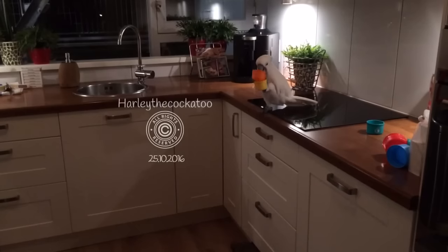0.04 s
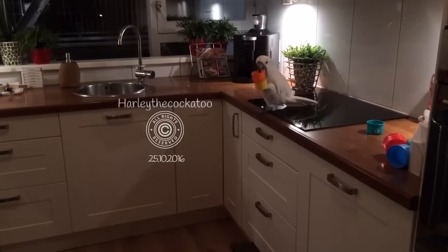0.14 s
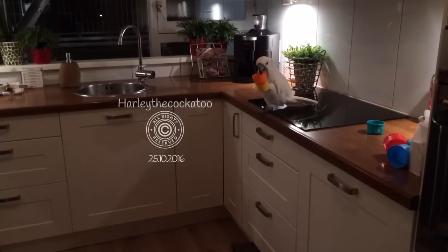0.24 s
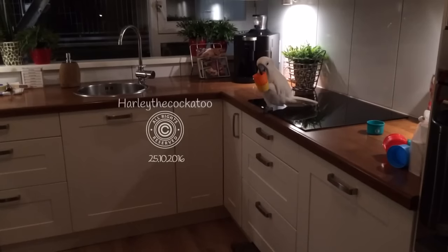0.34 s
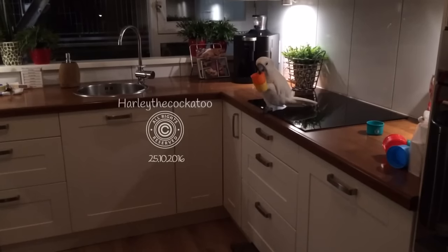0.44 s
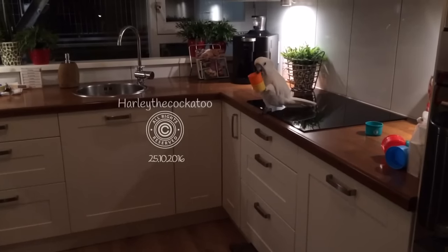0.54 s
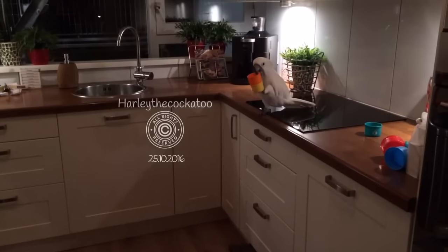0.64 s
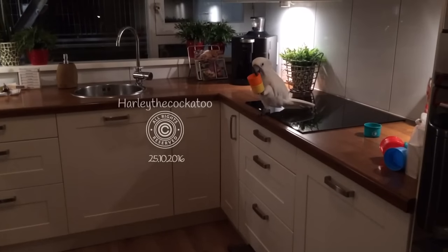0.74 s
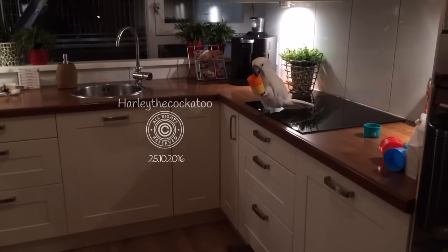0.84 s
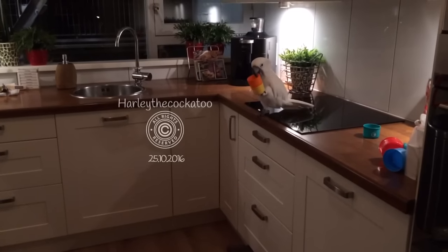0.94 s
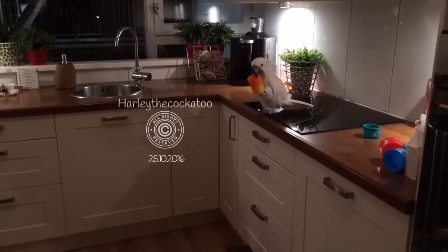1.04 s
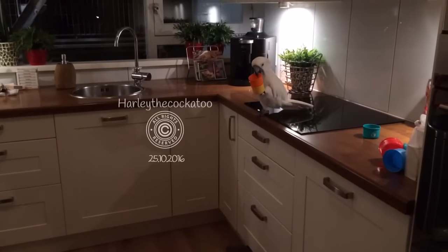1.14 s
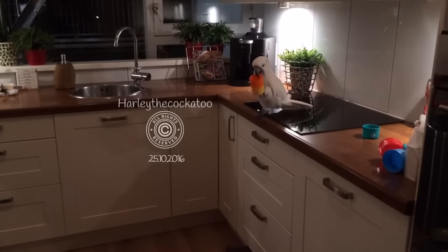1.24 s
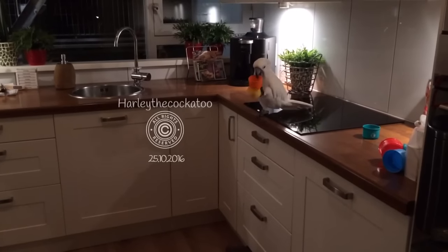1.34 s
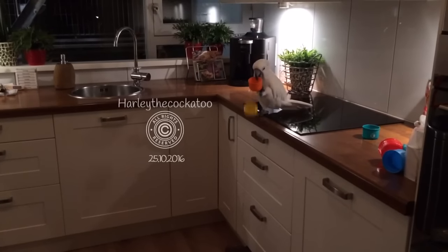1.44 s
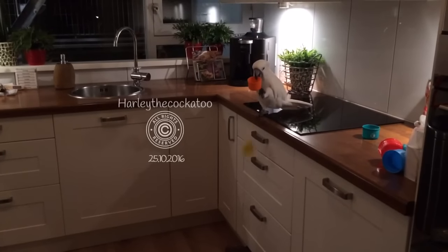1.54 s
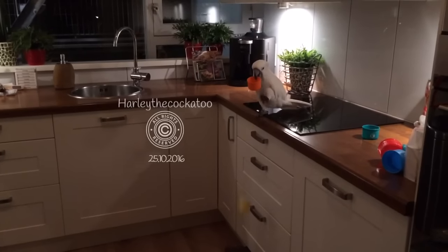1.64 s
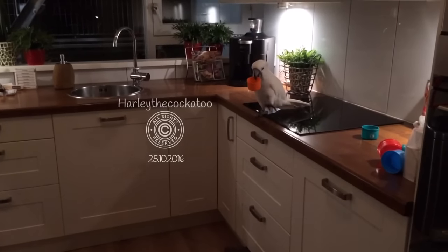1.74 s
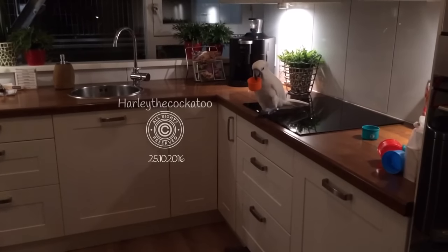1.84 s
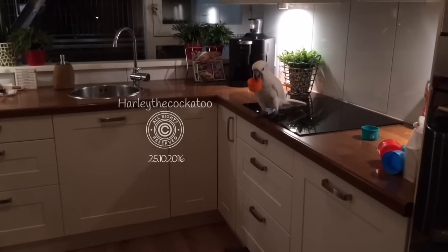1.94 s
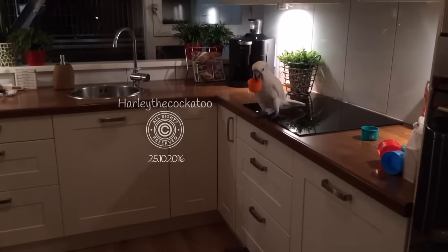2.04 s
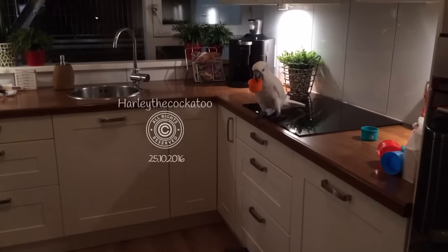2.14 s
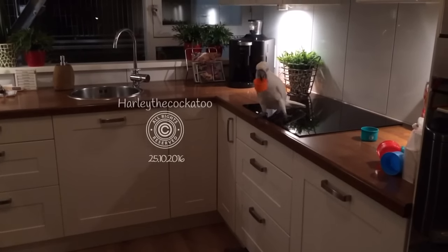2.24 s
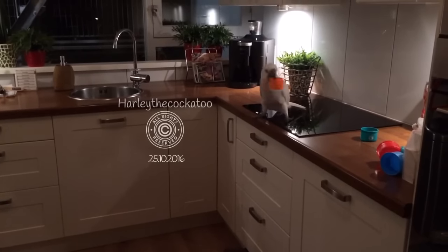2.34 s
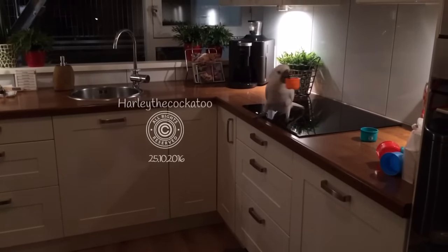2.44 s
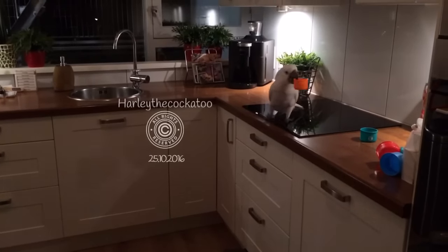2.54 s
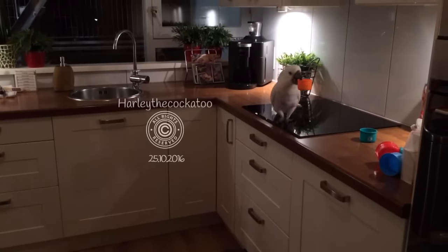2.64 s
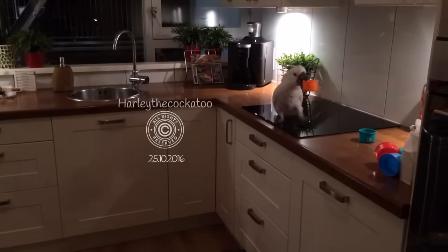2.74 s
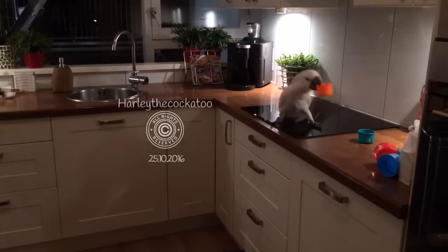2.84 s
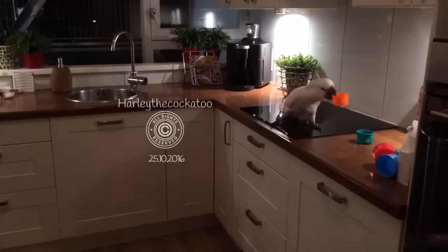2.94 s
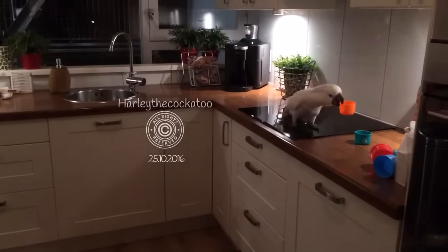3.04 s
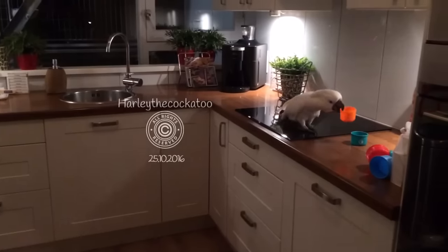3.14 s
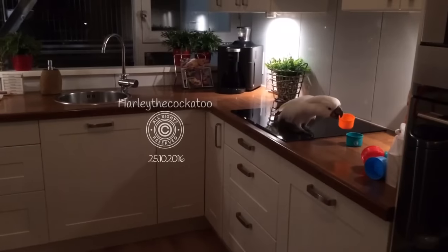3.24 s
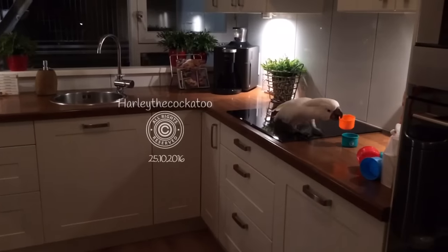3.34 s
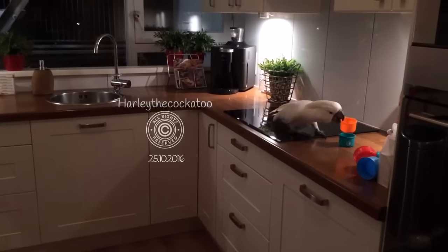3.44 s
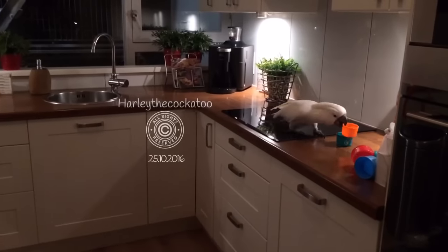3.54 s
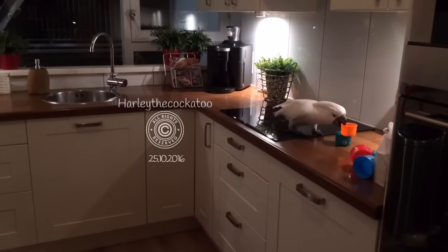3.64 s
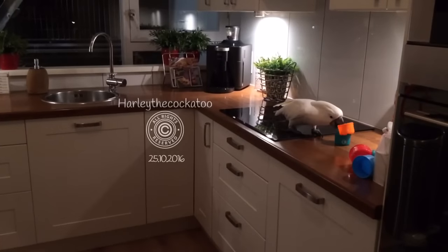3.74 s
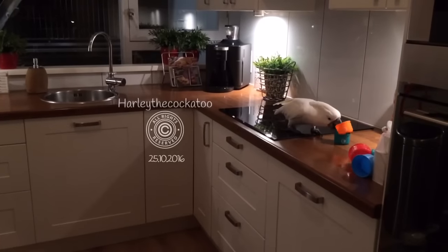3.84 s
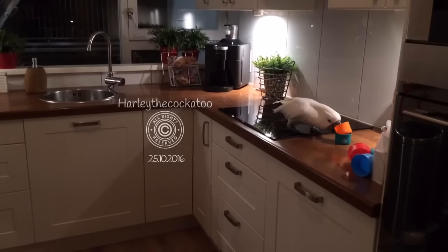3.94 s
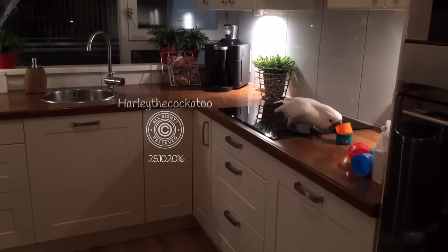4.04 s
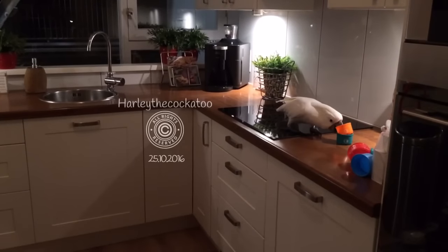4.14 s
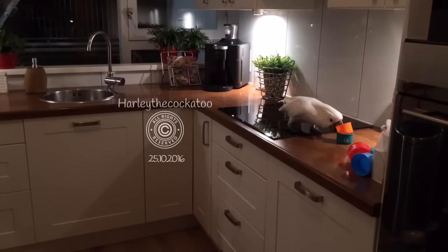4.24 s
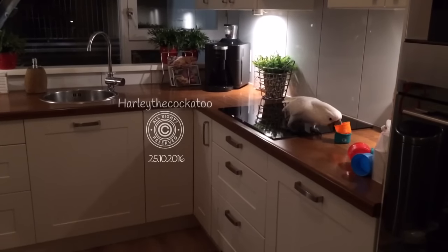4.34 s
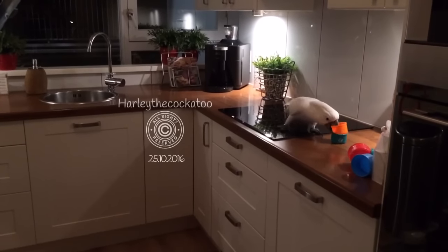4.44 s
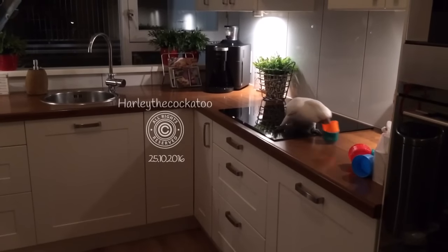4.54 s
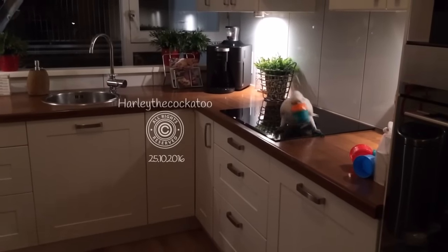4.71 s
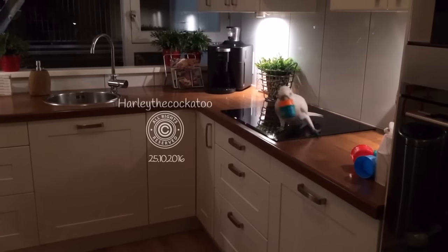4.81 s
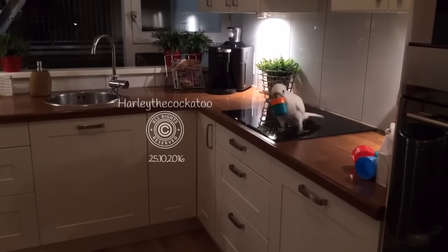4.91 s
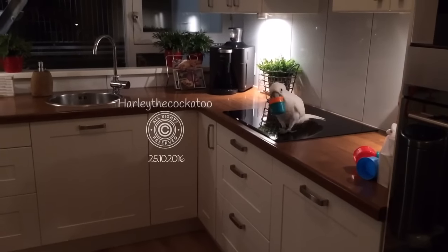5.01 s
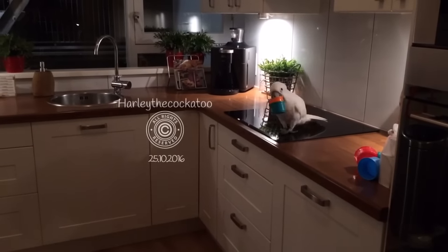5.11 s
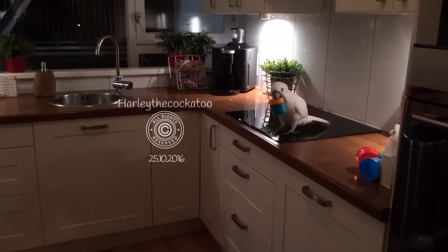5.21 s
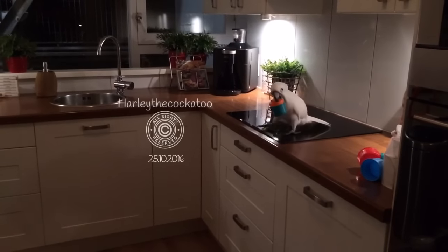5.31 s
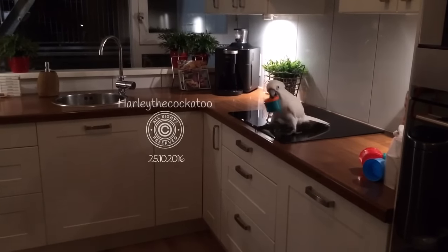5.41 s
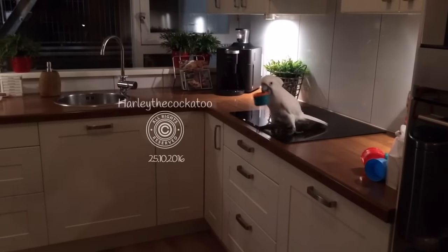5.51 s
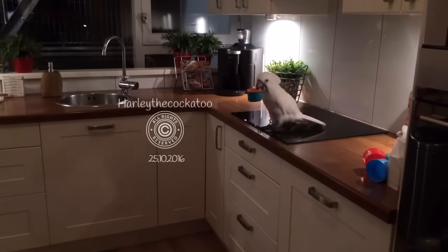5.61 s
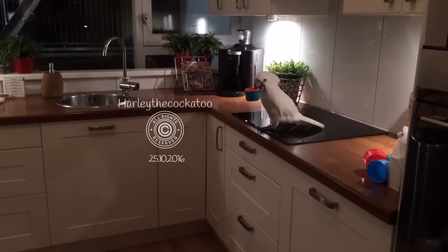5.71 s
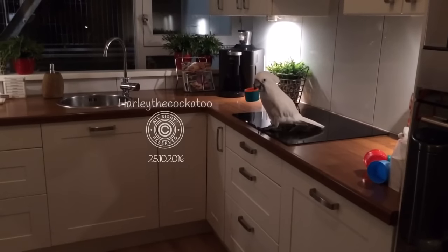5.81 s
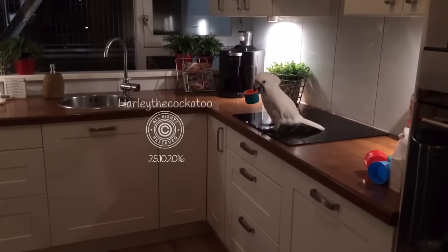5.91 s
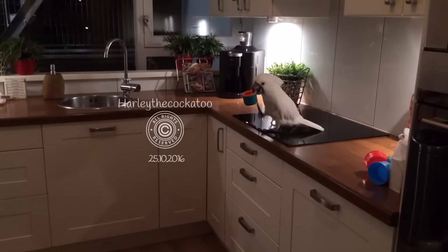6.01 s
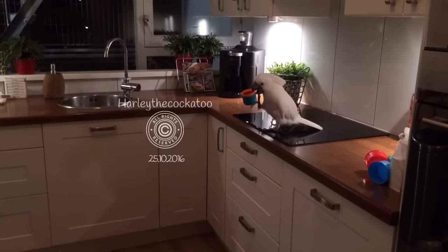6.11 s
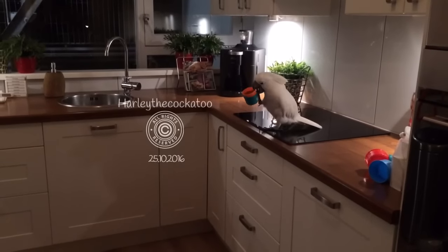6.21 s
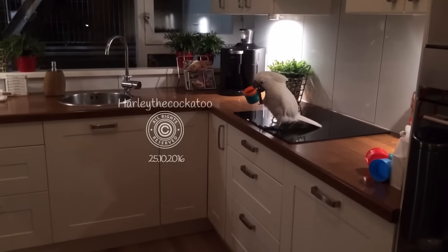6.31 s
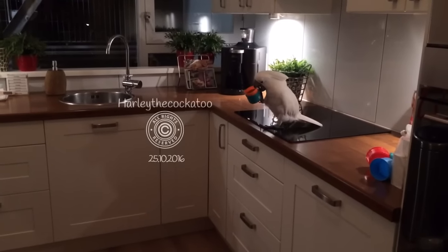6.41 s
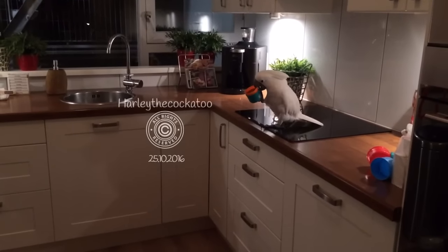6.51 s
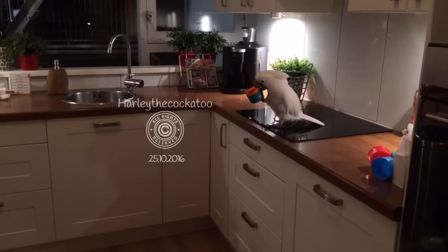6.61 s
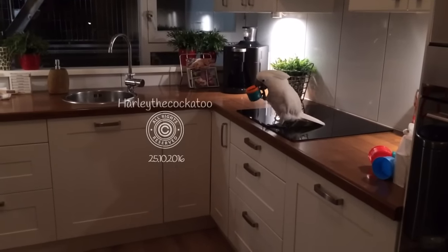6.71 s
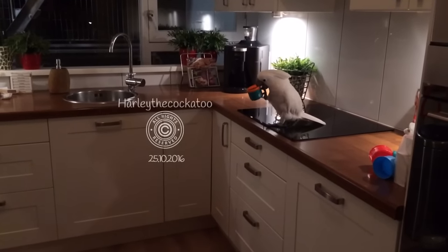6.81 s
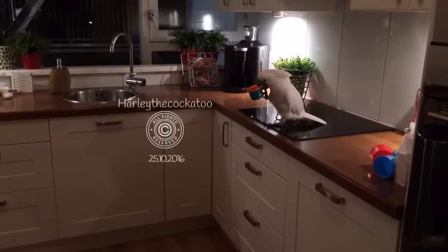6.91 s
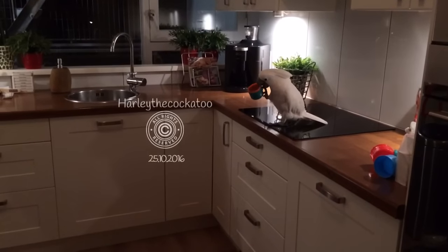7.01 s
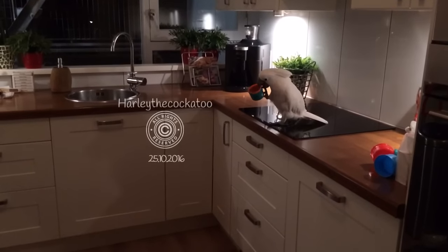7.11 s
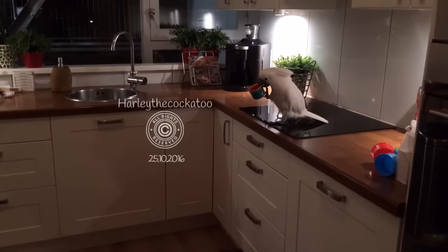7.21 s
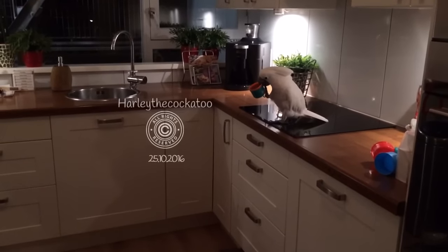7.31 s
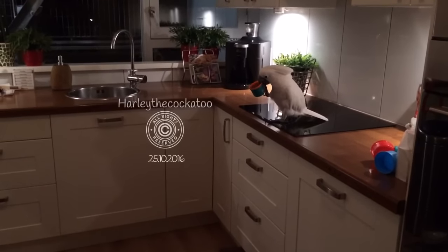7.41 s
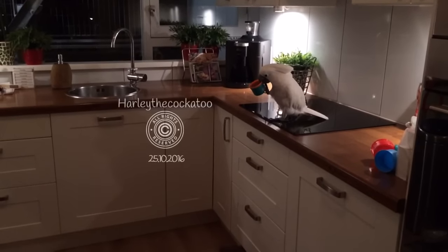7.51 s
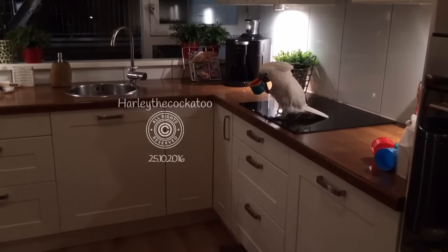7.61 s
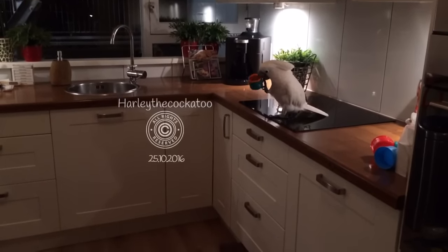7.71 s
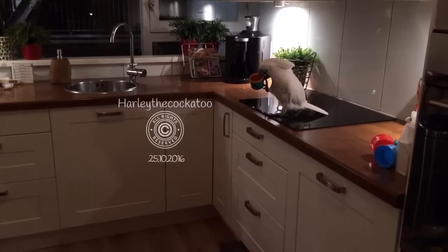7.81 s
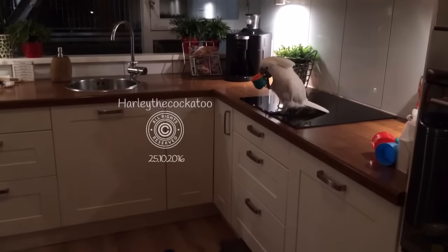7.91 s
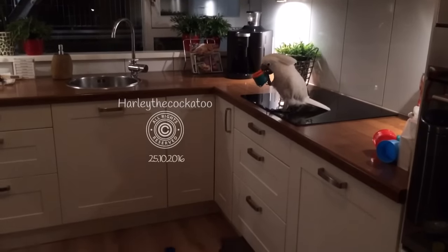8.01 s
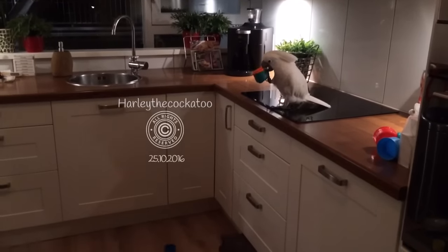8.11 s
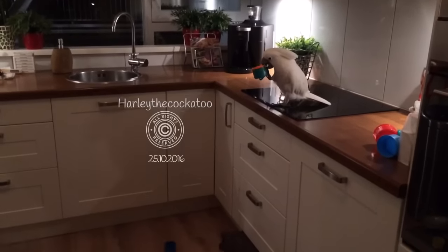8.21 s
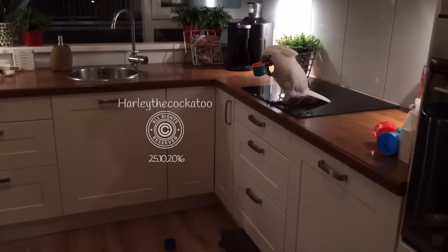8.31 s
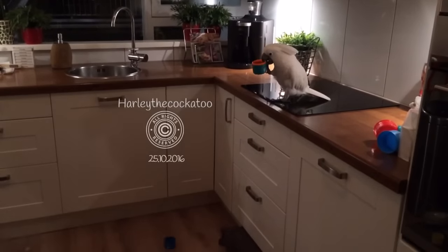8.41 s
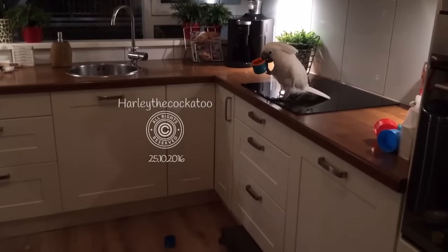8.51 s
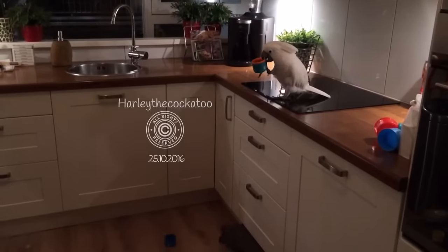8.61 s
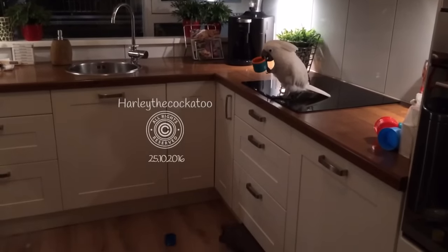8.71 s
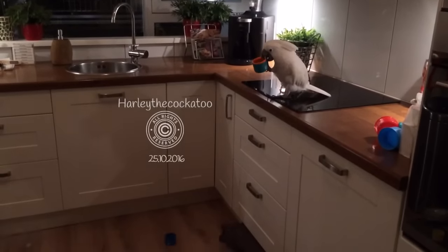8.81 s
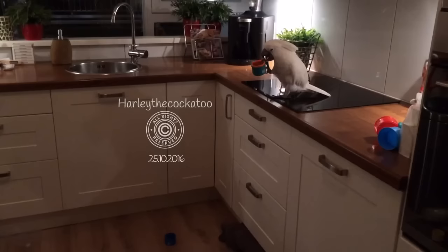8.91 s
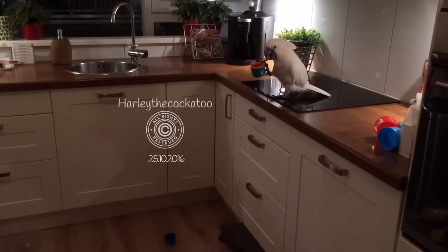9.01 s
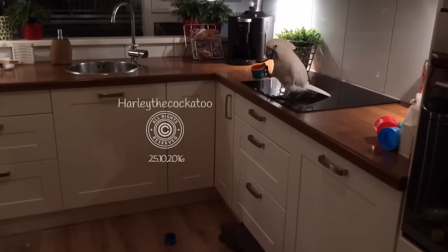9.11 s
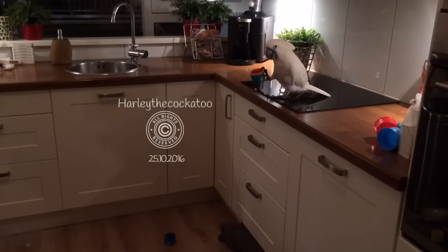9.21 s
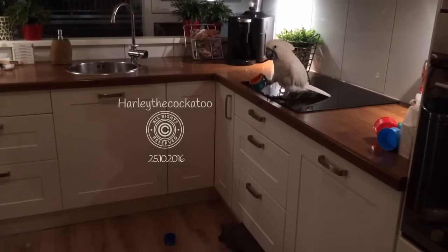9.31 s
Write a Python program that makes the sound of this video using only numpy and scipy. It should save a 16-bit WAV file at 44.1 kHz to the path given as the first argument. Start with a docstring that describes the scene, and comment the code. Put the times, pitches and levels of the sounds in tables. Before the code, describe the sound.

Thin plastic cups knock together with short, hollow, mid-pitched notes and crisp cracks, with tiny claw and beak clicks and dry rubbing between them. Early on a cup falls and slaps hard on floorboards. Afterwards come soft feather rustles, dull bumps on the worktop, one strong clack, a quieter stretch, and irregular light rattling. Heard from across a hard-surfaced kitchen with short reverberation and a faint low hum-like murmur.

```python
"""Small plastic stacking cups knock and chatter as a cockatoo plays with them on a glass hob in a quiet kitchen.
Each knock rings a hollow note and wall modes (damped sines) under a filtered crack; one cup falls on a wooden floor.
Beak and claws click in bursts of short pulses, dull thuds ring low modes, and random slips make rubs and rustles.
Contacts pass through a synthetic room of echoes and decaying noise; a low murmur and faint hiss lie beneath."""
import sys
import numpy as np
from scipy import signal
from scipy.fft import rfft, irfft
from scipy.io import wavfile

SR = 44100
rng = np.random.default_rng(int(sys.argv[2]) if len(sys.argv) > 2 else 0)


def wav_out(sig):
    """Save sig, one row per channel (or a flat mono array), as 16-bit PCM at SR to the path in sys.argv[1]."""
    wavfile.write(sys.argv[1], SR, np.round(np.clip(np.atleast_2d(sig).T, -1, 1) * 32767).astype(np.int16))


N = 412335
LENGTH = 32768  # samples in one hit or response
T = np.arange(LENGTH) / SR
HZ = np.fft.rfftfreq(LENGTH, 1 / SR)
TAP = signal.unit_impulse(LENGTH)  # a single clean contact

# wall modes of the early and later cups: (frequency [Hz], nominal width [Hz], level [dB])
FIRST_PAIR_MODES = [(1010, 810, -14), (1305, 390, -3), (1613, 260, -4), (1880, 220, -6), (2150, 330, -8.5),
                    (3400, 400, -19.5), (4123, 100, -15), (6330, 710, -14.5), (6750, 410, -18.5)]
SECOND_PAIR_MODES = [(910, 70, -8), (1160, 570, -0.5), (1540, 720, 2), (1920, 110, -6.5),
                     (2130, 320, -10.5), (2780, 520, -13.5)]
# falling cup's floor contacts:
# (time [s], relative force [dB], dullness [dB/octave], extra direct sound [dB])
FALL_CONTACTS = [(1.8934, 4.5, 2, 4), (1.897, 5.5, 3, -1.5), (1.905, -12, 0, 6), (1.9215, 0, 4.5, 4.5),
                 (1.937, -4.5, 17, 2.5)]

# a contact of this length has the plain spectrum; longer knocks are duller, longer clicks more diffuse
CONTACT_S, DULL_DB_PER_DOUBLING, DIFFUSE_DB_PER_DOUBLING = 0.0051, 4, 2.1


def gain_of(db):
    """Decibels to amplitude."""
    return 10 ** (np.asarray(db) / 20)


def evened(x):
    """Scales to rms 1."""
    return x / np.sqrt(np.mean(x ** 2) + 1e-20)


def at_level(x, db):
    """Sets the rms of a hit's first 50 ms."""
    return gain_of(db) * x / np.sqrt(np.mean(x[:SR // 20] ** 2) + 1e-20)


def read(points, hz):
    """Interpolates linearly on a log-frequency axis."""
    f, value = np.transpose(points)
    return np.interp(np.log(hz + 1), np.log(f + 1), value)


def add(mix, start_s, sound):
    """Mixes a sound in at start_s."""
    part = mix[round(start_s * SR):][:len(sound)]
    part += sound[:len(part)]


def through(x, response):
    """Convolves and keeps the length."""
    return signal.fftconvolve(x, response)[:len(x)]


def shaped(x, spectrum):
    """Filters a whole sound by this spectrum, at rms 1."""
    gain = gain_of(read(spectrum, np.fft.rfftfreq(N, 1 / SR)))
    return evened(irfft(rfft(x) * gain, N))


def snap(spectrum, tilt_db=0):
    """Minimum-phase pulse with this spectrum, tilted in dB/octave above 550 Hz."""
    octaves = np.log2(np.maximum(HZ / 550, 1))
    log_gain = np.log(gain_of(read(spectrum, HZ) + tilt_db * octaves))
    # folding the cepstrum makes the pulse causal
    cepstrum = irfft(log_gain)[:LENGTH // 2]
    cepstrum[1:] *= 2
    return irfft(np.exp(rfft(cepstrum, LENGTH)))


def ring(modes):
    """Damped sines that swell briefly as the blow spreads, their relative energies set in dB."""
    total = np.zeros(LENGTH)
    for hz, width_hz, db in modes:
        envelope = T * np.exp(-np.pi * width_hz * T)
        sine = np.sin(2 * np.pi * (hz * T + rng.random()))
        total += gain_of(db) * evened(envelope * sine)
    return evened(total)


def chatter(seconds, per_s, after_db):
    """One firm contact, then a dying run of smaller random slips."""
    happens = rng.random(LENGTH) < per_s / SR
    decay = np.exp(-(T / max(seconds, 1e-4) / 2) ** 2)
    force = gain_of(after_db) * rng.standard_normal(LENGTH) * happens * decay
    force[0] = 1
    return force


def kitchen(force, near_db, early_db, late_db, direct_db=0, early_t60_s=0.23, rise_s=0.0062):
    """Contacts arrive direct, off worktop and tiles, as a quick wash, then as the room's decaying tail."""
    # reverberation: (frequency [Hz], t60 [s])
    t60_table = [(150, 0.88), (500, 0.61), (1500, 0.77), (3500, 0.59), (7000, 0.53), (14000, 0.25)]
    signs = rng.choice([-1., 1.], (2, LENGTH))
    taps, wash = signs * (rng.random((2, LENGTH)) < 5000 / SR)
    hz, t, z = signal.stft(taps, SR, nperseg=256)
    decay = gain_of(-60 * t / read(t60_table, hz)[:, None])
    tail = signal.istft(z * decay, SR, nperseg=256)[1][:LENGTH]

    force = force / np.linalg.norm(force)
    # scattered echoes of separate contacts add by energy
    late_power = (1 - np.exp(-(T / rise_s) ** 2)) ** 2
    late = tail * np.sqrt(abs(through(force ** 2, late_power)))
    early_power = gain_of(-60 * T / early_t60_s) ** 2 * (T > .003)
    early = wash * np.sqrt(abs(through(force ** 2, early_power)))

    reflections = np.zeros(LENGTH)
    at = (rng.uniform(.001, .009, size=6) * SR).astype(int)
    reflections[at] = rng.choice([-1., 1.], size=6)
    near = through(force, reflections)
    parts = [(near_db, near), (early_db - direct_db, early), (late_db - direct_db, late)]
    return force + sum(gain_of(db) * part / np.linalg.norm(part) for db, part in parts)


def knocks(focus_db_per_octave=12, squeak_db=-8, second_pair_from_s=3.9):
    """Each knock rings the cups' hollow and their walls, under the crack of rim on rim."""
    # (time [s], ring level [dB], hollow note [Hz], hollow share of ring [0-1],
    #  crack level [dB], chatter time [s])
    knock_table = [(.102, -58, 1560, 0.5, -64, .004), (0.2242, -33, 1465, 0.44, -48.5, 0.0081),
                   (.544, -30.5, 1180, 0.7, -36.5, 0.0041), (0.723, -40, 1840, 0.48, -58, 0.0059),
                   (0.997, -40.5, 1630, 0.73, -68, 0.0024), (1.34, -55, 1210, .25, -66.5, 0.0037),
                   (1.376, -63, 1400, 0.2, -49.5, 0.014), (1.393, -45.5, 1216, 1, -68, 0.013),
                   (1.425, -48.5, 1440, 0, -53.5, 0.0089), (1.456, -49, 1438, 0.95, -73.5, .003),
                   (2.562, -39, 1064, 0.8, -80, .001), (2.698, -46.5, 1276, 0.97, -71, 0.0012),
                   (2.767, -56, 1370, 0.4, -65, .002), (3.625, -49, 1380, 0.8, -62.5, 0.02),
                   (3.653, -30.5, 1457, 0.56, -37.5, 0.012), (3.957, -42.5, 1320, 0.73, -57, 0.0091),
                   (4.02, -37.5, 1142, 0.7, -47.5, 0.0061), (4.503, -45, 1420, 0.33, -59, .012),
                   (5.619, -63.5, 925, 0.37, -78, 0.0037), (6.071, -67.5, 1040, 0.9, -88, 0.0092),
                   (6.32, -56.5, 1700, 0.98, -76, 0.0023), (6.365, -56, 1650, .6, -66, 0.01),
                   (6.594, -50.5, 1560, 0.3, -51, 0.0038), (6.77, -53, 1685, 0.7, -55, .006),
                   (7.071, -40, 1650, 0.13, -56, 0.0032), (7.141, -51, 1270, 0.36, -68, 0.0025),
                   (7.388, -56, 1490, 0.07, -67, 0.0031), (7.581, -55, 1380, 0.23, -63, 0.005),
                   (7.759, -44, 1183, 0.54, -43.5, 0.0095), (7.775, -39.5, 1800, 0.33, -64, .007),
                   (7.82, -46.5, 1220, 0.4, -75, 0.0047), (7.949, -53.5, 1035, 0.95, -69, 0.004),
                   (8.029, -54, 1790, 0.4, -60.5, 0.0019), (8.157, -47, 1810, 0.52, -52, 0.012),
                   (8.659, -46.5, 1204, 0.04, -67, 0.0037), (8.769, -46.5, 1640, 0.53, -46, .005)]
    # rim crack: (frequency [Hz], density [dB/Hz])
    crack_spectrum = [(200, -52), (700, -15), (1200, -5.5), (2400, 0), (3300, 0), (4200, -1), (5100, -4),
                      (6700, -4.5), (8200, -10.5), (11000, -12.5), (15000, -23)]
    # so small a cup radiates little bass, and its soft wall little treble
    body_band = signal.butter(3, [740, 2400], "band", fs=SR, output="sos")
    out = np.zeros(N)
    for start_s, db, hollow_hz, share, crack_db, seconds in knock_table:
        bright_db = -DULL_DB_PER_DOUBLING * np.log2(seconds / CONTACT_S)
        force = chatter(seconds, per_s=900, after_db=-5)
        path = kitchen(force, near_db=-5.5, early_db=6.5, late_db=-3, direct_db=2.5)
        cups = FIRST_PAIR_MODES if start_s < second_pair_from_s else SECOND_PAIR_MODES
        share = np.clip(share, 0, 1)

        # the grip shifts wall modes a little; a strong hollow note favours those near it
        wall_modes = []
        for hz, width_hz, mode_db in cups:
            if hz < 2500:
                away_db = share * focus_db_per_octave * abs(np.log2(hz / hollow_hz))
                wall_modes.append((hz * rng.uniform(0.98, 1.02), width_hz * 0.89, mode_db - away_db))
        wall = at_level(through(path, ring(wall_modes)), 0)
        hollow = at_level(through(path, ring([(hollow_hz, 190, 0)])), 0)
        body = np.sqrt(share) * hollow + np.sqrt(1 - share) * wall
        body = signal.sosfilt(body_band, body)

        # only the hard edge of the blow reaches the high modes
        squeak = ring([mode for mode in cups if mode[0] >= 2500])
        edge = evened(snap(crack_spectrum, bright_db)) + gain_of(squeak_db) * squeak
        add(out, start_s, at_level(body, db) + at_level(through(path, edge), crack_db))
    return out


def fall(slap_db=-4, total_db=-17):
    """The cup lands on its rim, slaps flat and rattles, ringing its own modes and the boards'."""
    # cup and board modes: (frequency [Hz], width [Hz], level [dB])
    floor_modes = [(438, 100, -9.5), (458, 120, -2.5), (710, 130, -9), (910, 240, -13), (1080, 310, -1.5),
                   (1200, 320, -3.5), (1555, 180, -2), (1788, 230, 6.5), (1947, 200, -1), (2050, 101, -3.5),
                   (2210, 170, -18), (2660, 400, -14.5), (3650, 600, -21.5)]
    # flat slap: (frequency [Hz], density [dB/Hz])
    slap_spectrum = [(40, -63), (130, -33), (260, -2), (450, 4.5), (750, -4.5), (2000, 3.5), (3500, -8),
                     (5500, -19.5), (8000, -27.5), (11000, -42), (15000, -48.5)]
    out, blows = np.zeros(N), np.zeros(LENGTH)
    first_s = FALL_CONTACTS[0][0]
    for start_s, force_db, dull_db, direct_db in FALL_CONTACTS:
        body = ring(floor_modes) + gain_of(slap_db) * evened(snap(slap_spectrum))
        contact = snap([(100, 0.0059), (15000, 0.011)], -dull_db)  # near flat before its tilt
        # the cup turns between contacts, so each reaches the room differently
        path = kitchen(TAP, near_db=-11.5, early_db=0.0, late_db=-5.5, direct_db=direct_db)
        blow = through(through(body, contact), path)
        add(blows, max(start_s - first_s, 0), at_level(blow, force_db))
    # high-pass keeps deep bass out of the fall
    blows = signal.sosfilt(signal.butter(2, 110, "high", fs=SR, output="sos"), blows)
    add(out, first_s, at_level(blows, total_db))
    return out


def clicks():
    """Beak and claws slip on a hard surface: tight bursts of bright ticks."""
    # (time [s], level [dB], brightness [dB/octave], scrape time [s])
    click_table = [(.004, -58, 4, 0.0052), (.286, -67, 3, .003), (.475, -59, 5, 0.0025),
                   (0.543, -53, 1, .003), (1.033, -54, 2.5, 0.0044), (1.316, -62, 1, 0.00055),
                   (1.427, -59, 9, 0.0092), (2.324, -58, -3, 0.013), (2.562, -49, 2, .001),
                   (2.699, -53.5, 0, 0.0012), (2.798, -54, 1, 0.0022), (2.923, -46, -3.5, 0.015),
                   (2.95, -42.5, -1, 0.005), (3.157, -58.5, 4.5, 0.023), (4.3, -61, -10, 0.011),
                   (4.564, -59, 1, 0.013), (5.1, -59.5, -1.5, 0.016), (5.452, -50.5, -2, .007),
                   (5.752, -51.5, .5, 0.0057), (6.317, -49, 3.5, 0.0043), (6.364, -46, 2, 0.0051),
                   (6.594, -42, 8, 0.0041), (6.74, -60, -5.5, 0.0032), (7.066, -58, -3.5, .004),
                   (7.405, -64, 1, 0.0057), (7.775, -53.5, 18, .009), (8.109, -67, 0, 0.0037),
                   (8.148, -60, 2, 0.0043), (8.157, -49, 1.5, 0.0079), (8.657, -48, 2.5, 0.0048),
                   (8.767, -45, 1, 0.0028)]
    # tick: (frequency [Hz], density [dB/Hz])
    click_spectrum = [(200, -46), (550, -20.5), (900, -11.5), (1700, -8), (2400, -3), (3200, -1.5),
                      (5000, -1.5), (7100, 2), (8500, -4.5), (10500, -5.5), (15000, -21)]
    out = np.zeros(N)
    for start_s, db, bright_db, seconds in click_table:
        direct_db = 0.2 - DIFFUSE_DB_PER_DOUBLING * np.log2(seconds / CONTACT_S)
        force = chatter(seconds, per_s=1300, after_db=-4.0)
        path = kitchen(force, near_db=0.5, early_db=6.5, late_db=-3, direct_db=direct_db)
        add(out, start_s, at_level(through(path, snap(click_spectrum, bright_db)), db))
    return out


def thuds():
    """Dull bumps on worktop and floor: two low, well damped modes each."""
    # (time [s], level [dB], pitch [Hz])
    thud_table = [(0.726, -51, 647), (1.0, -53.5, 620), (2.391, -54, 414), (2.432, -60.5, 450),
                  (2.698, -58, 253), (2.93, -61, 148), (3.959, -59, 153), (4.022, -47.5, 212),
                  (4.503, -47, 780), (8.156, -61.5, 171)]
    out = np.zeros(N)
    for start_s, db, hz in thud_table:
        wood = ring([(hz, 150, 0), (hz * 1.66, 240, -7)])
        path = kitchen(TAP, near_db=5.5, early_db=7.0, late_db=2.0)
        add(out, start_s, at_level(through(wood, path), db))
    return out


def friction(body, per_s, spread_db):
    """Many tiny slips of uneven size excite a body in the room, at rms 1."""
    size = gain_of(spread_db * np.minimum(rng.exponential(1, N), 4))
    slips = size * rng.standard_normal(N) * (rng.random(N) < per_s / SR)
    path = kitchen(TAP, near_db=3.5, early_db=-0.5, late_db=-0.5)
    return evened(through(through(slips, body), path))


def effort(moves, idle_db, attack_s=0.0093, release_s=0.046):
    """Movement strength: attack, hold and release of each move, power-summed over faint fidgeting."""
    t = np.arange(N) / SR
    power = np.full(N, gain_of(idle_db) ** 2)
    for start_s, hold_s, db in moves:
        attack = np.clip((t - start_s) / attack_s, 0, 1)
        release = np.exp(-np.maximum(t - start_s - hold_s, 0) / release_s)
        power += (gain_of(db) * attack * release) ** 2
    return np.sqrt(power)


def rubbing(grip_width_hz=180):
    """Held cups rub with each change of grip; their ring changes once one has fallen."""
    # grip shifts: (time [s], hold [s], level [dB])
    grip_table = [(0, 0.09, -53), (.1, 0.1, -54), (.25, 0.38, -62), (.48, 0.24, -52), (.8, 0.74, -65.5),
                  (1.12, 0.019, -55.5), (1.22, 0.08, -63), (1.5, 0.14, -79), (2.5, 0.28, -61.5),
                  (3.7, 0.72, -69.5), (4.39, 0.12, -60), (5.38, 0.19, -68), (6.23, 0.21, -67),
                  (6.48, 0.43, -64), (7.15, 0.17, -57), (7.8, 0.31, -61), (8.38, 0.085, -62),
                  (8.6, 0.44, -59)]
    # beak and toes damp the walls, widening every mode
    first, second = (ring([(hz, width_hz + grip_width_hz, db) for hz, width_hz, db in cups])
                     for cups in (FIRST_PAIR_MODES, SECOND_PAIR_MODES))
    before = friction(first, per_s=1800, spread_db=6.0)
    after = friction(second, per_s=390, spread_db=4.0)
    slips = np.where(np.arange(N) / SR < FALL_CONTACTS[0][0], before, after)
    return effort(grip_table, idle_db=-74) * slips


def rustle():
    """Feathers and feet brush the glass in dense tiny slips with each shuffle."""
    # shuffles: (time [s], hold [s], level [dB])
    shuffle_table = [(.1, 1.17, -72), (1.63, 0.04, -64), (1.99, 0.022, -58.5), (2.65, 0.54, -65.5),
                     (3.14, 0.13, -63.5), (3.41, 0.12, -59), (4.97, 0.2, -64), (5.67, 0.13, -61.5),
                     (6.45, 0.84, -73), (7.05, 0.31, -68.5), (8.06, 0.25, -71), (8.58, 0.45, -63.5),
                     (9.19, 0.13, -67)]
    # brushing: (frequency [Hz], density [dB/Hz])
    feather_spectrum = [(400, -43.5), (1500, 2), (3200, 8.5), (6500, 6), (9500, 2), (15000, -8)]
    brush = friction(snap(feather_spectrum), per_s=8500, spread_db=7.5)
    return effort(shuffle_table, idle_db=-79) * brush


def room_tone(murmur_db=-59, hiss_db=-66.5):
    """Steady low murmur of the house under a faint hiss: two filtered noises."""
    # noise spectra: (frequency [Hz], density [dB/Hz])
    murmur_spectrum = [(15, -46), (25, -18.5), (36, -16.5), (54, -3), (70, 1), (108, -8.5), (141, 3),
                       (205, -7.5), (252, -1), (313, -10), (345, -11), (380, -15.5), (413, -20.5),
                       (450, -28), (580, -55), (990, -120)]
    hiss_spectrum = [(150, -6.5), (400, 0), (800, -4.5), (1500, -8), (2400, -13.5), (4000, -17),
                     (7000, -19), (10000, -24), (15000, -28)]
    low, high = rng.standard_normal((2, N))
    murmur = gain_of(murmur_db) * shaped(low, murmur_spectrum)
    return murmur + gain_of(hiss_db) * shaped(high, hiss_spectrum)


def scene():
    """Sums all sources into one channel."""
    return (knocks() + fall() + clicks() + thuds() + rubbing() + rustle() + room_tone())[None]


def record(dry, edge_hz=15600):
    """Linear-phase low-pass: removes the band above edge_hz."""
    lowpass = signal.firwin(511, edge_hz, window=("kaiser", 9), fs=SR)
    return signal.oaconvolve(dry, lowpass[None], "same")


dry = scene()
out = record(dry)
wav_out(out)
```